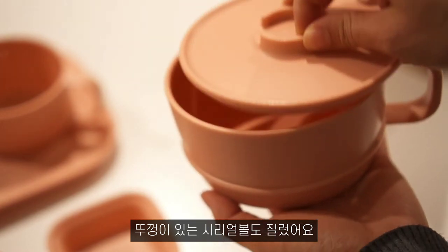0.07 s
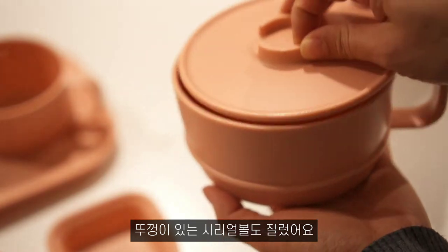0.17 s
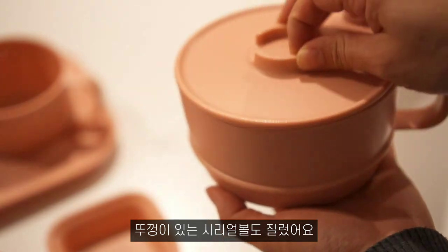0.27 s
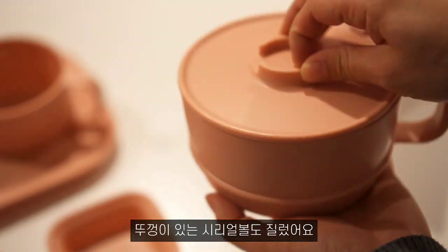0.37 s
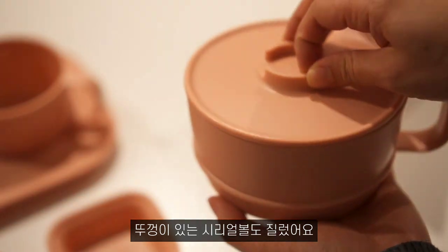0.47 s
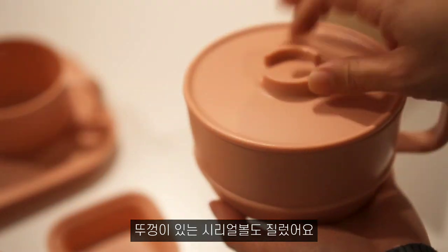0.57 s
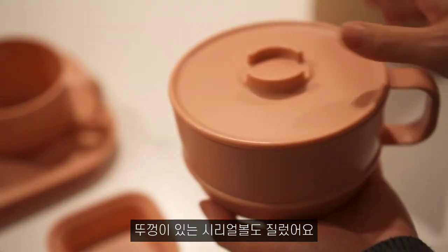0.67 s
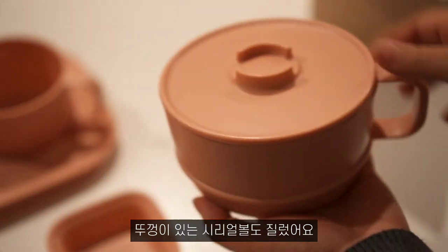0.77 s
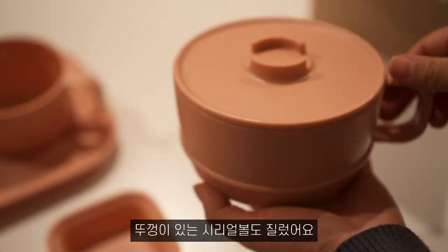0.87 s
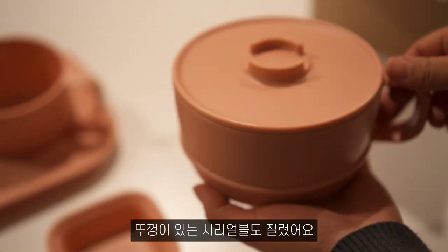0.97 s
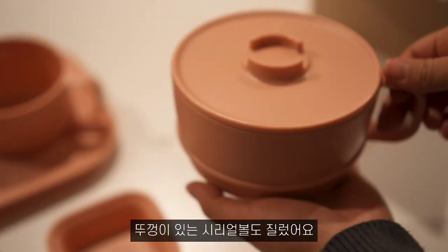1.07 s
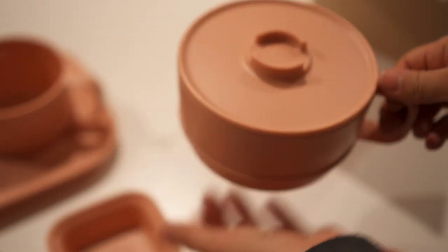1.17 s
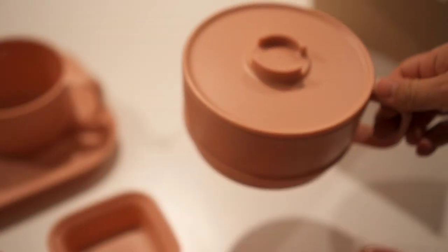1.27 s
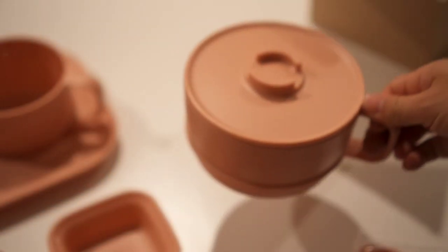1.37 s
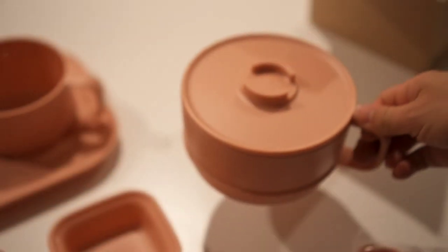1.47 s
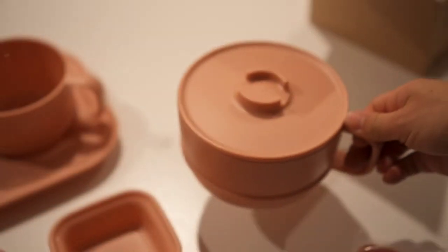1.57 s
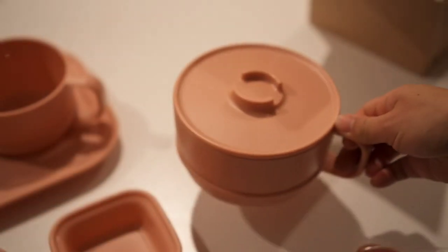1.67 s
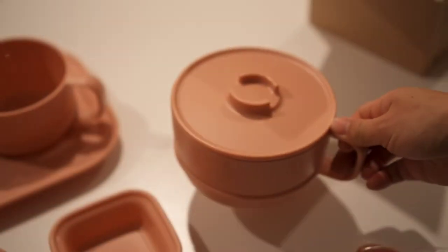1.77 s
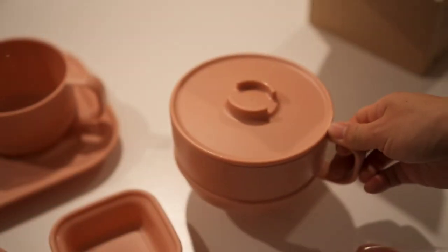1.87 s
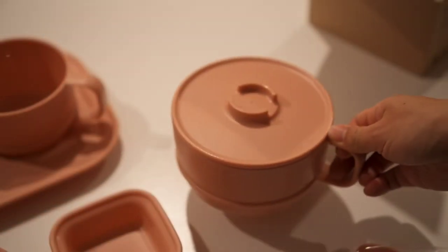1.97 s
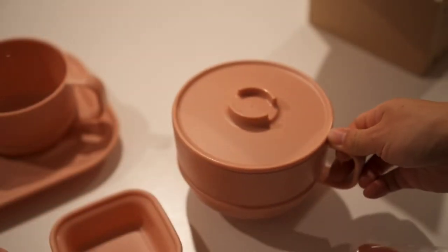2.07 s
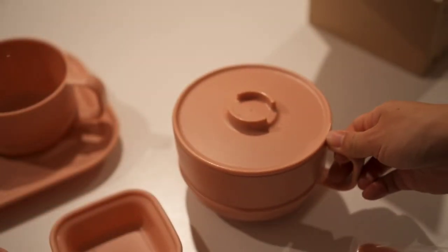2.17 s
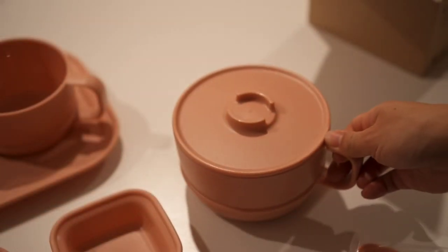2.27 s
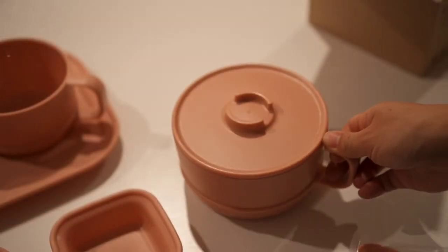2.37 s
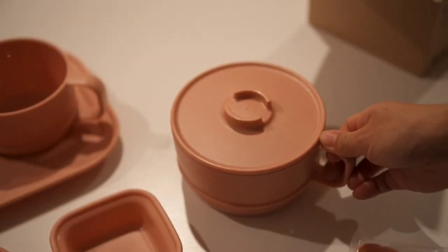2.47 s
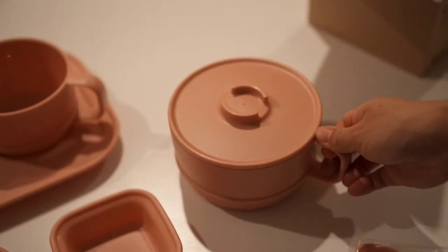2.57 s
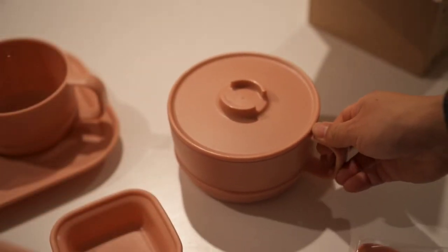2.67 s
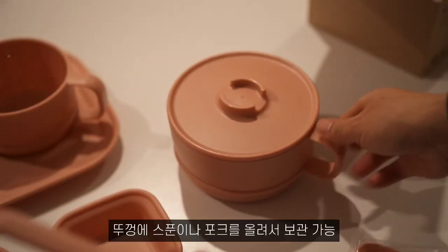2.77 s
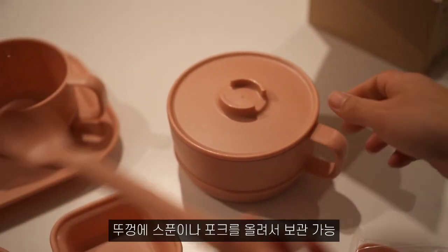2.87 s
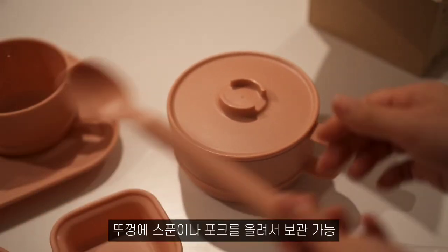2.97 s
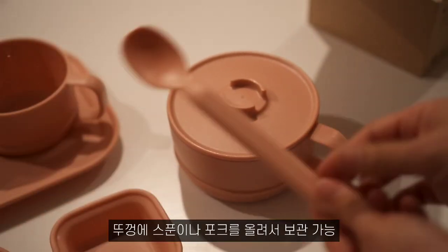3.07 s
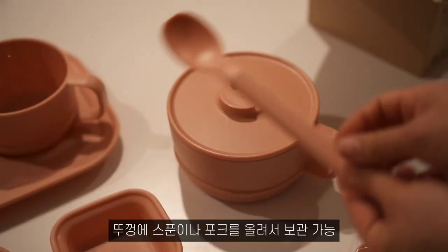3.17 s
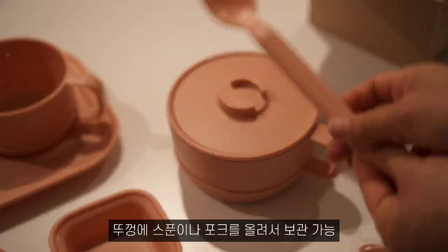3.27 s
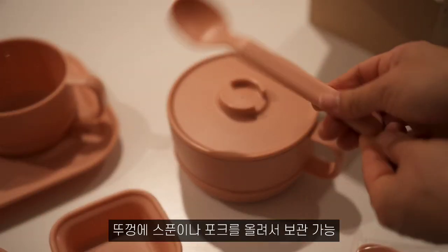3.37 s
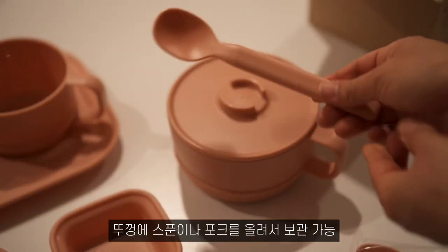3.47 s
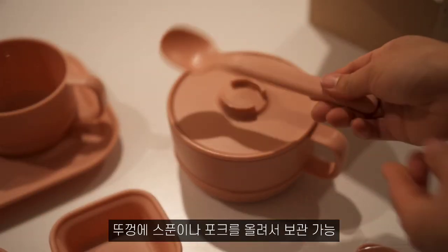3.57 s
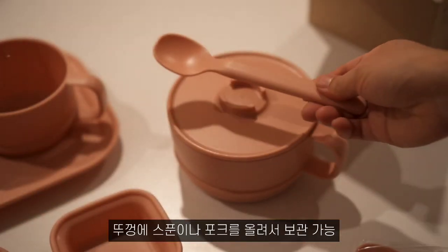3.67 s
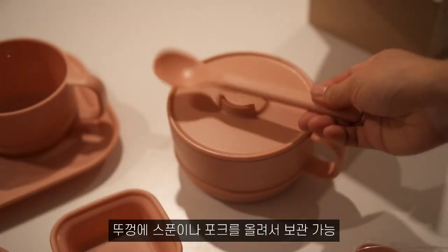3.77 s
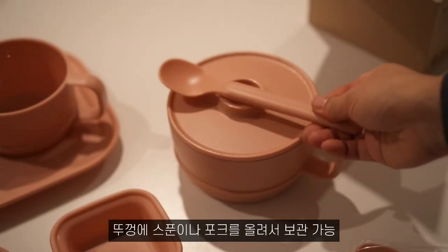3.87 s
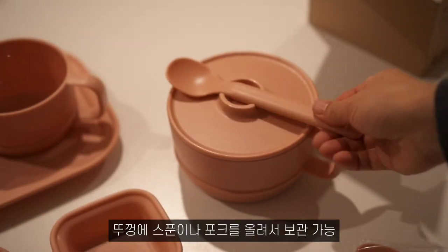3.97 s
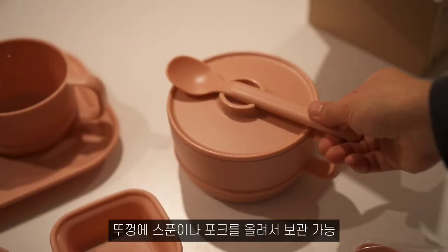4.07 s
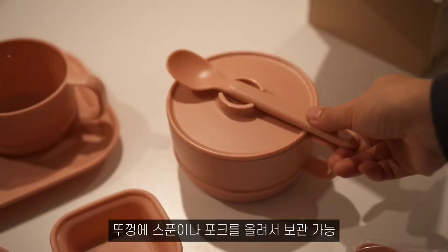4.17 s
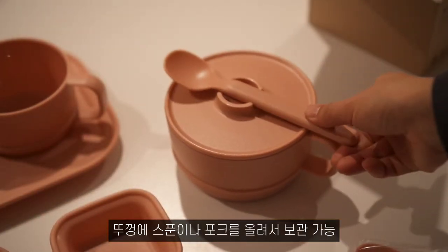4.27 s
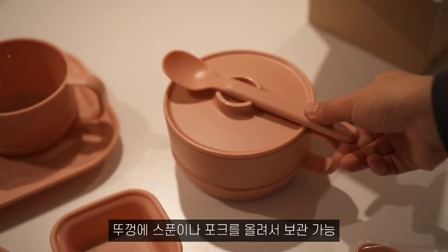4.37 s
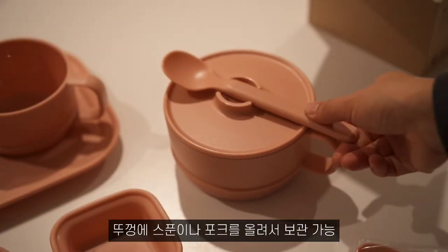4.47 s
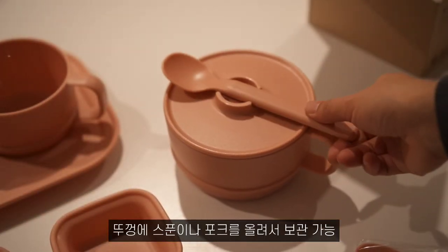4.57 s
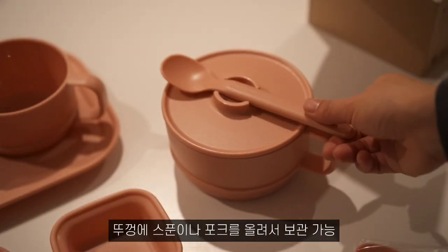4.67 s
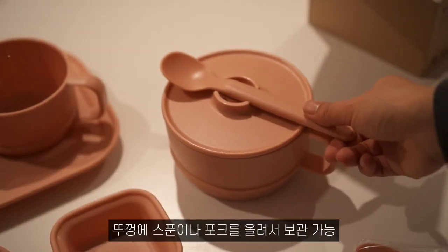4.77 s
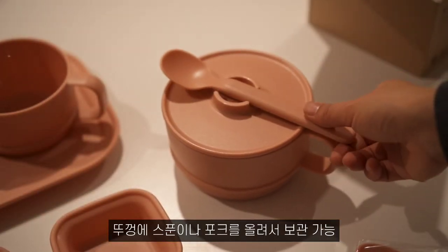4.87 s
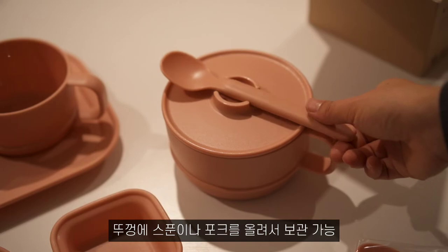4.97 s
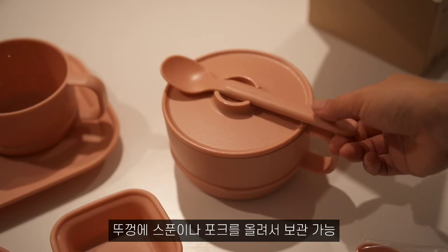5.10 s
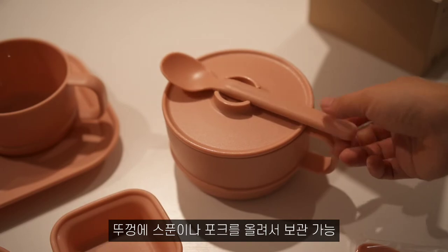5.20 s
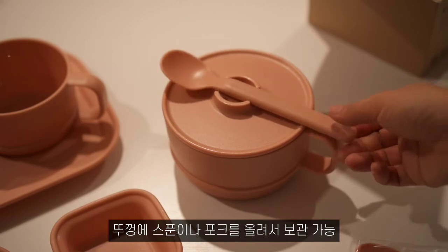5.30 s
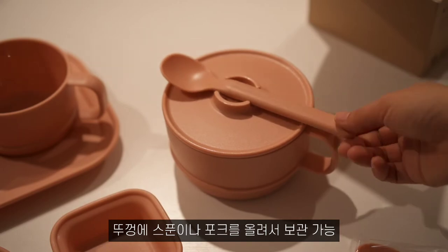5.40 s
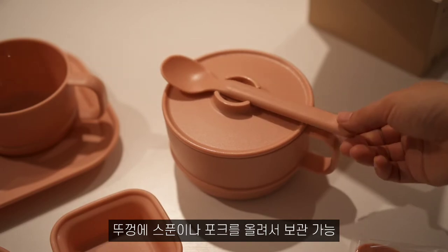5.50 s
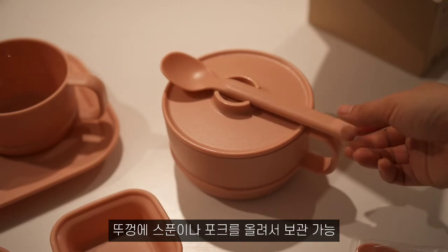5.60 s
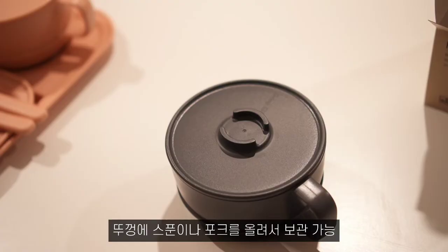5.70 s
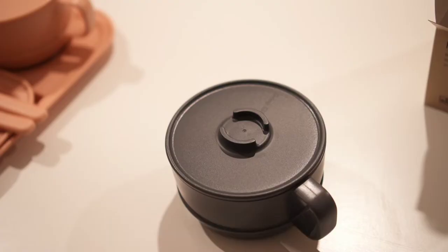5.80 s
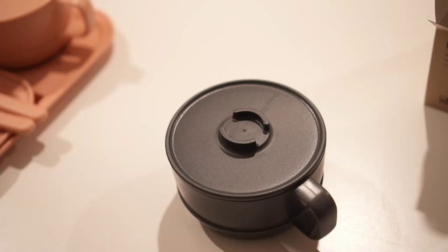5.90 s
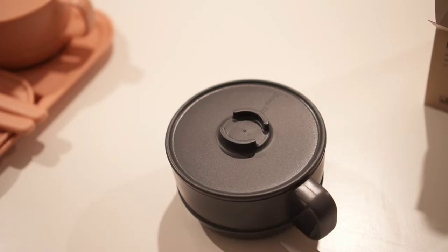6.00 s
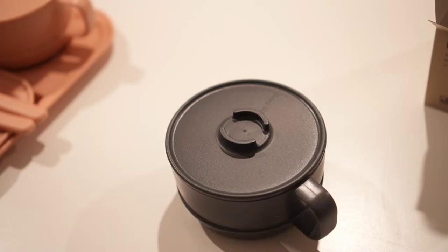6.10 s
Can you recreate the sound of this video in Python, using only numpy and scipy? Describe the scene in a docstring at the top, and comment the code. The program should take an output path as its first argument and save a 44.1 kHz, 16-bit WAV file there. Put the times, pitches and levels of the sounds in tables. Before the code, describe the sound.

Close stereo pickup in a small, quiet room with faint ventilation. A lid clacks twice onto a bowl, with a brief hollow hoot sinking in pitch. Light fingernail ticks and soft shuffles follow as the bowl is carried, then it lands with a knock, low thump and quick chatter. A spoon clatters onto the lid in two groups of hard clacks, then is nudged with smaller clicks. A sleeve rustles at the end.

```python
"""Lidded bowl and spoon

A lid is dropped onto a ceramic cereal bowl, the bowl is set on a table, and a spoon is laid on the lid and nudged.
Every contact is a click, a short dense ring of noise and a few decaying modes.
The air under the closing lid hoots in sinking tones, and the closed bowl thumps in low, slowly rising ones.
A small room answers each knock over a faint ventilation hiss and rumble; skids, shuffles and cloth are shaped noise.
"""
import sys
import numpy as np
from scipy import signal
from scipy.fft import rfft, irfft, next_fast_len
from scipy.io import wavfile
from scipy.ndimage import map_coordinates

SR = 44100
rng = np.random.default_rng(int(sys.argv[2]) if len(sys.argv) > 2 else 0)


def dump(signal):
    """Clip the signal to [-1, 1] and save it as 16-bit WAV at the path in sys.argv[1]."""
    limited = np.clip(np.atleast_2d(signal).T, -1, 1)
    pcm = np.round(limited * 32767).astype(np.int16)
    wavfile.write(sys.argv[1], SR, pcm)


N = 270774  # length in samples


def amp(db):
    """Decibels to gain."""
    return 10 ** (np.asarray(db) / 20)


def unit(x):
    """Scale to rms 1."""
    return x / np.sqrt(np.mean(x ** 2))


def unit_energy(x):
    """Scale to a mean energy of 1 per channel."""
    return unit(x) / np.sqrt(x.shape[-1])


def along(points, hz):
    """Read (Hz, value) points on a log frequency axis."""
    point_hz, value = np.transpose(points)
    return np.interp(np.log(hz + 1), np.log(point_hz + 1), value)


def fade(t, t60):
    """Exponential decay, 60 dB down at t60 seconds."""
    return np.exp(-np.log(1000) * t / t60)


def swell(strokes):
    """Gain of a set of strokes: each gathers smoothly to its peak, then dies away; their powers add."""
    power = np.zeros(N)
    for peak_s, peak_db, rise_s, t60_s in strokes:
        t = np.arange(N) / SR - peak_s
        gather = np.exp(-2 * (np.minimum(t, 0) / rise_s) ** 2)
        power += amp(peak_db) ** 2 * gather * fade(np.maximum(t, 0), t60_s) ** 2
    return np.sqrt(power)


def grain(depth_db, rate):
    """A gain of rms 1 that wanders smoothly between random values, rate of them a second."""
    knots = rng.standard_normal(int(N * rate / SR) + 4)
    return unit(amp(depth_db * map_coordinates(knots, [np.arange(N) * rate / SR])))


def filtered(x, response):
    """Zero-phase filter with a gain given as a function of frequency."""
    n = x.shape[-1]
    padded = next_fast_len(n + SR // 10)
    spectrum = rfft(x, padded) * response(np.fft.rfftfreq(padded, 1 / SR))
    return irfft(spectrum, padded)[..., :n]


def coloured(x, level_db, size=32768):
    """Minimum-phase filter: causal, so that nothing sounds before a blow."""
    cepstrum = irfft(np.log(amp(level_db(np.fft.rfftfreq(size, 1 / SR)))))
    # fold the cepstrum onto positive time
    cepstrum[1:size // 2] *= 2
    cepstrum[size // 2 + 1:] = 0
    return irfft(rfft(x, size) * np.exp(rfft(cepstrum)), size)[..., :x.shape[-1]]


def noise_pair(n, alike):
    """White stereo noise with a given left-right likeness: more alike means more mid and less side."""
    turn = lambda hz: np.arccos(np.clip(along(alike, hz), -1, 1)) / 2
    balance = lambda hz: np.array([np.cos(turn(hz)), np.sin(turn(hz))])
    mid, side = filtered(rng.standard_normal((2, n)), balance)
    return np.array([mid + side, mid - side])


def rush(colour, alike):
    """Steady coloured stereo noise of rms 1."""
    return unit(filtered(noise_pair(N, alike), lambda hz: amp(along(colour, hz))))


def add(track, start_s, sound):
    """Mix a sound into the track, cut off at the track's end."""
    part = track[:, round(start_s * SR):][:, :sound.shape[-1]]
    part += sound[..., :part.shape[-1]]


# How long the room rings: pitch_hz, t60_s
ROOM_DECAY = [(100, 0.44), (300, 0.36), (1000, 0.39), (2000, 0.34), (5000, 0.32), (12000, 0.27)]
# How similar the room's tail is left and right: pitch_hz, likeness (1 = same)
ROOM_LIKENESS = [(200, 1), (900, 0.84), (2500, 0.56), (7000, 0.19), (15000, .15)]
# Relative strength of the walls' answer: pitch_hz, level_db
WALL_COLOUR = [(120, 3.5), (300, -1), (600, 3.5), (1200, -2.5), (3000, 0), (12000, -0.5)]


def in_room(sound, wet_db, build=0.0047):
    """The sound and a fresh diffuse tail, which builds up as the walls answer and dies at its own pace per band."""
    t = np.arange(SR // 2) / SR
    hz, frames, bands = signal.stft(noise_pair(len(t), ROOM_LIKENESS), SR, nperseg=256)
    bands = bands * fade(frames, along(ROOM_DECAY, hz)[:, None])
    bands = bands * amp(along(WALL_COLOUR, hz))[:, None]
    tail = signal.istft(bands, SR, nperseg=256)[1][:, :len(t)]
    tail = unit_energy(tail * (1 - np.exp(-(t / build) ** 2)))
    answer = signal.fftconvolve(sound.mean(0)[None], tail, axes=1)[:, :sound.shape[-1]]
    return sound + amp(wet_db) * answer


# Modes of the crockery and the table under it, before each blow's colour and scatter: pitch_hz, level_db, t60_s
CROCKERY_MODES = [(140.4, -14.5, 0.42), (231, -23, 0.2), (320.2, -14.5, 0.24), (396.5, -14.5, 0.11),
                  (763, -11.5, 0.4), (870, -12, 0.069), (1188, -9, 0.13), (1268, -6, 0.11),
                  (1508, -12, 0.34), (1593, -11.5, 0.25), (1850, -11, 0.28), (2003, -7, 0.077),
                  (2217, -13.5, 0.12), (2920, -8.5, .12), (3810, -11, 0.16), (4060, -13, 0.15),
                  (5300, -19, 0.092)]
# How similar the direct sound is left and right: pitch_hz, likeness (1 = same)
DIRECT_LIKENESS = [(400, 1), (1500, 0.69), (6000, 0.71), (15000, 0.34)]


def knocks(rows, colour, ring_t60, ring_db, modes_db, wet_db, contact=0.000065,
           dense_hz=650, bass_hz=450, clack_octaves=0.44, treble_hz=3200):
    """Each contact: a click, a dense short ring and the modes, coloured by where and how hard the touch is."""
    track, t = np.zeros((2, N)), np.arange(SR // 2) / SR
    mode_hz, mode_db, mode_t60 = np.transpose(CROCKERY_MODES)[:, :, None]
    modes = np.sin(2 * np.pi * mode_hz * t) * fade(t, mode_t60)
    modes = modes / np.linalg.norm(modes, axis=1, keepdims=True)
    click = fade(t, contact) / fade(t, contact).sum()
    for start_s, level_db, bass_db, clack_hz, clack_db, treble_db in rows:
        # the quickly damped modes crowd together only above the bass
        crowd = filtered(noise_pair(len(t), DIRECT_LIKENESS), lambda hz: hz ** 2 / (hz ** 2 + dense_hz ** 2))
        ring = unit_energy(crowd * fade(t, ring_t60))
        # every point of contact favours other modes
        tones = (amp(mode_db + rng.normal(0, 1.4, mode_db.shape)) * modes).sum(0)
        blow = click + amp(ring_db) * ring + amp(modes_db) * tones
        touch = lambda hz: (along(colour, hz)
                            + bass_db / (1 + (hz / bass_hz) ** 4)
                            + clack_db * np.exp(-(np.log2((hz + 1) / clack_hz) / clack_octaves) ** 2)
                            + treble_db * hz ** 2 / (hz ** 2 + treble_hz ** 2))
        # levels count the dry blow's energy as if spread over 10 ms
        blow = unit_energy(coloured(blow, touch)) * np.sqrt(SR / 100)
        add(track, start_s, amp(level_db) * in_room(blow, wet_db))
    return track


def chatter(runs, gap_s=.013, slop_s=.002, scatter_db=-1, centre_hz=1820, octaves=0.59, clack_db=2):
    """Runs of quick, uneven contacts that weaken overall; the clack wanders as the point of contact travels."""
    contacts = []
    for start_s, length_s, first_db, dying_db_per_s, bass_db, treble_db in runs:
        for k, (slop, force, spot) in enumerate(rng.standard_normal(size=(40, 3))):
            t = k * gap_s
            if t < length_s:
                contact_s = start_s + t + slop_s * slop
                level_db = first_db - dying_db_per_s * t + scatter_db * force
                clack_hz = centre_hz * 2 ** (octaves * spot)
                contacts.append((contact_s, level_db, bass_db, clack_hz, clack_db, treble_db))
    return contacts


# Colour of the room air, relative: pitch_hz, level_db
AIR_COLOUR = [(12, -60), (20, -46), (74, -1.5), (150, -1), (542, -5.5), (738, -6), (825, -5.5), (949, 0),
              (1330, -8.5), (1530, -4), (2460, -11.5), (2750, -6), (3070, -13), (13500, -19.5),
              (16000, -22.5)]
# How similar the air is left and right: pitch_hz, likeness (1 = same)
AIR_LIKENESS = [(60, 1), (300, 0.12), (1000, 0.23), (4000, 0.11)]


def ventilation(air_db=-59, whistle_hz=1020, width_hz=110, whistle_db=-68):
    """Steady room air with one faint duct resonance."""
    resonance = lambda hz: 1 / (1 + (2 * (hz - whistle_hz) / width_hz) ** 2)
    duct = filtered(noise_pair(N, AIR_LIKENESS), resonance)
    return amp(air_db) * rush(AIR_COLOUR, AIR_LIKENESS) + amp(whistle_db) * unit(duct)


# The slow rumble of moving arms: peak_s, peak_db, rise_s, t60_s
ARM_STROKES = [(1.75, -72.5, .4, 9.9), (2.4, -72, 0.6, 2.6), (5.7, -73.5, .45, 5)]
# Colour of the rumble, relative: pitch_hz, level_db
LOW_COLOUR = [(20, -24), (48, -12), (80, -14), (160, -21), (500, -82)]


def rumble(blows, rest_db=-83, shake_db=-28, shake_s=0.072, on_table_s=2.4):
    """The table shakes with the bass of every blow on it; moving arms add a slow rumble to a steady floor."""
    bass = filtered(blows.mean(0), lambda hz: 1 / (1 + (hz / 450) ** 4))
    # the bowl is held in the air until on_table_s
    bass = bass * (np.arange(N) / SR > on_table_s)
    memory = np.exp(-np.arange(SR // 2) / SR / shake_s)
    shake = np.sqrt(np.abs(signal.fftconvolve(bass ** 2, memory / memory.sum())[:N]))
    gain = amp(rest_db) + np.hypot(swell(ARM_STROKES), amp(shake_db) * shake)
    return gain * rush(LOW_COLOUR, [(50, 0.98)])


# The lid lands on one edge, then drops shut; clack is the tone of the struck spot:
# start_s, level_db, extra_bass_db, clack_hz, clack_db, extra_treble_db
LID_KNOCKS = [(.2019, -27, -27, 1530, 2, -16), (.2098, -23, -14, 2530, 7, -7),
              (.2128, -24, -20, 2510, 9, 1.5), (.3282, -21.5, 3.5, 5600, 5.5, 3),
              (.3372, -18, 10.5, 1950, 8.5, 3.5), (.3638, -33, -29, 7700, 5, 10),
              (.372, -26, 5.5, 2490, 6, -19)]
# Colour of the lid's blows, relative: pitch_hz, level_db
LID_TONE = [(40, -87), (100, -30.5), (200, -15.5), (300, -5.5), (480, -3), (850, -4), (1150, -7.5),
            (1900, -7), (3200, -17), (5000, -16.5), (6500, -26.5), (10000, -34), (16000, -38)]


def lid_on_bowl():
    """Glazed edge meets rim: bright clacks over a short ring."""
    return knocks(LID_KNOCKS, LID_TONE, ring_t60=0.027, ring_db=6, modes_db=-14, wet_db=-7)


# Air ringing under the lid, lower as the gap closes; level is before rise and decay:
# start_s, start_hz, end_hz, level_db, t60_s
LID_HOOTS = [(0.2024, 735, 680, -18, 0.085), (0.2133, 658, 605, -14, 0.16),
             (0.3281, 469, 441, -14.5, 0.125)]


def hoots(settle=0.084, rise=.001, wet_db=-8):
    """The bowl's air rings through the gap under the lid and sinks in pitch as the lid settles."""
    track, t = np.zeros((2, N)), np.arange(SR // 2) / SR
    for start_s, start_hz, end_hz, level_db, t60_s in LID_HOOTS:
        hz = end_hz + (start_hz - end_hz) * np.exp(-t / settle)
        envelope = (1 - np.exp(-(t / rise) ** 2)) * fade(t, t60_s)
        tone = amp(level_db) * np.sin(2 * np.pi * np.cumsum(hz) / SR) * envelope
        add(track, start_s, in_room(np.array([tone, tone]), wet_db))
    return track


# Blows that set the whole closed bowl thumping; level is before rise and decay:
# start_s, level_db, pitch_hz, rise_s, t60_s
BOWL_THUMPS = [(.369, -20.5, 289, 0.0011, 0.041), (.98, -32, 283.5, 0.0028, 0.11),
               (1.108, -44, 294, 0.0095, 0.092), (2.417, -46.5, 307, .01, 0.17),
               (2.574, -9, 315, 0.0036, 0.026), (2.855, -35.5, 294, 0.013, 0.038),
               (4.075, -24, 305, .0017, 0.1), (5.405, -31, 308, 0.0045, .12)]


def thumps(wet_db=-10):
    """A soft contact rises slowly and wakes only the bowl's lowest resonance."""
    track, t = np.zeros((2, N)), np.arange(SR // 2) / SR
    for start_s, level_db, pitch_hz, rise_s, t60_s in BOWL_THUMPS:
        envelope = (1 - np.exp(-(t / rise_s) ** 2)) * fade(np.maximum(t - rise_s, 0), t60_s)
        tone = amp(level_db) * np.sin(2 * np.pi * pitch_hz * t) * envelope
        add(track, start_s, in_room(np.array([tone, tone]), wet_db))
    return track


# Fingernails tick on the crockery: start_s, level_db, clack_hz, extra_treble_db
NAIL_TICKS = [(.979, -48.5, 3700, -8), (1.01, -49.5, 890, -17), (1.114, -55, 4200, -1),
              (1.638, -62, 1500, -6), (1.965, -51.5, 1700, -19), (3.194, -50, 6560, 32),
              (3.327, -53, 7500, 2)]
# Colour of small sharp touches, relative; the cloth snaps share it: pitch_hz, level_db
SHARP_COLOUR = [(100, -12), (700, -0.5), (1500, -3), (3500, -1.5), (7000, -7), (15000, -11)]


def fingernail_ticks(clack_db=6):
    """Light, hard touches that barely wake the modes."""
    rows = [(start_s, level_db, 0, clack_hz, clack_db, treble_db)
            for start_s, level_db, clack_hz, treble_db in NAIL_TICKS]
    return knocks(rows, SHARP_COLOUR, ring_t60=0.022, ring_db=1, modes_db=-21, wet_db=-1.5)


# Fingertips skid on the glaze as they take and leave the handle: peak_s, peak_db, rise_s, t60_s
SKID_STROKES = [(1.119, -47.5, .01, 0.069), (2.847, -55, 0.013, 0.084)]
# Colour of the skids, relative: pitch_hz, level_db
SKID_TONE = [(500, -27), (2500, -8), (3200, 1), (4500, -8), (6500, -14), (15000, -26)]


def finger_skid():
    """Short bright rubs of the fingers on the handle."""
    return in_room(swell(SKID_STROKES) * rush(SKID_TONE, DIRECT_LIKENESS), wet_db=-5.5)


# Soft shuffles while the bowl is carried and let go: peak_s, peak_db, rise_s, t60_s
SHUFFLE_STROKES = [(1.475, -50.5, 0.055, 0.29), (1.595, -51.5, 0.014, .4), (1.99, -59.5, 0.032, 0.86),
                   (2.11, -58.5, 0.071, 0.38), (2.86, -55, 0.069, .3)]
# Colour of the shuffles, relative: pitch_hz, level_db
SHUFFLE_TONE = [(100, -24), (300, 16), (600, 9.5), (1200, 8.5), (2000, 2), (4000, -14), (12000, -23)]


def carrying_shuffle():
    """Handling the bowl makes dull, slightly grainy noise."""
    return swell(SHUFFLE_STROKES) * grain(depth_db=1, rate=180) * rush(SHUFFLE_TONE, ROOM_LIKENESS)


# The bowl lands on the edge of its foot, then comes down flat:
# start_s, level_db, extra_bass_db, clack_hz, clack_db, extra_treble_db
BOWL_KNOCKS = [(2.441, -19.5, 1.4, 1980, 3.7, -0.5), (2.5715, -32, 13.5, 600, 2.3, -20),
               (2.5765, -25, 10.7, 1080, 3, 1)]
# The landed bowl chatters on the table: start_s, length_s, first_db, dying_db_per_s, extra_bass_db, extra_treble_db
BOWL_RUNS = [(2.448, .11, -29, 77, -5, -3.5), (2.6, 0.3, -45, 52, 9, 4)]
# Colour of the bowl's blows, relative: pitch_hz, level_db
BOWL_TONE = [(40, -34), (120, -24), (240, 1), (450, 5.5), (750, 4), (1200, 1), (2100, -7.5), (2900, -17),
             (5000, -25.5), (9000, -39), (16000, -51)]


def bowl_on_table():
    """The foot knocks on the table and chatters."""
    rows = list(BOWL_KNOCKS) + chatter(BOWL_RUNS)
    return knocks(rows, BOWL_TONE, ring_t60=0.029, ring_db=6, modes_db=-11.5, wet_db=-2)


# Strokes of the sleeve: peak_s, peak_db, rise_s, t60_s
SLEEVE_STROKES = [(3.47, -61.5, 0.072, 1), (5.742, -50.5, .004, 0.53), (5.862, -48.5, .012, 0.28),
                  (5.905, -45, 0.016, 0.45), (5.975, -50, 0.022, 0.2)]
# Colour of the cloth, relative: pitch_hz, level_db
SLEEVE_TONE = [(120, -38), (200, -13), (263, -12), (353, -8), (763, -14), (899, -15), (1840, -3),
               (15100, -6.5), (16000, -39)]


def sleeve_rustle():
    """Cloth catches and slips in tiny grains, louder on the right."""
    cloth = rush(SLEEVE_TONE, [(300, 0.42), (3000, 0.06)])
    return swell(SLEEVE_STROKES) * grain(depth_db=2.0, rate=760) * cloth * amp([[-1], [3.4]])


# The spoon meets the lid, drops into the notch of the knob and settles:
# start_s, level_db, extra_bass_db, clack_hz, clack_db, extra_treble_db
SPOON_KNOCKS = [(3.937, -21, 3.5, 2000, 8.3, 2), (3.9437, -32, 16.5, 700, 2.5, 5),
                (3.961, -24, -10, 2090, 5.5, -10), (3.971, -28.5, 13, 1700, 2.8, -22),
                (4.0657, -22.5, 1, 2680, 6.1, -15.5), (4.0725, -19.5, 3, 1260, 3.1, -9),
                (4.0762, -21.5, -9, 13100, 4.1, 19), (4.224, -37, 6.5, 1300, 2.7, -23)]
# The landed spoon chatters: start_s, length_s, first_db, dying_db_per_s, extra_bass_db, extra_treble_db
SPOON_RUNS = [(4.083, .12, -36, 80, 2.2, -7)]
# Colour of the spoon's blows, relative: pitch_hz, level_db
SPOON_TONE = [(40, -57), (120, -22), (220, -3.5), (310, 0), (520, -1.5), (780, -4), (1300, -7.5),
              (2100, -7), (3100, -13.5), (5000, -14.5), (9000, -23.5), (16000, -36)]


def spoon_on_lid():
    """The spoon knocks on the lid with a very short ring, then chatters."""
    rows = list(SPOON_KNOCKS) + chatter(SPOON_RUNS)
    return knocks(rows, SPOON_TONE, ring_t60=0.015, ring_db=10.0, modes_db=-10.5, wet_db=-2)


# The spoon is nudged in its notch: start_s, level_db, extra_bass_db, clack_db, extra_treble_db
SPOON_NUDGES = [(4.312, -26.5, -4, 6, -7.5), (4.32, -33.5, -1.5, 6.5, -4), (4.742, -49, 4.5, 1, -5),
                (4.768, -51.5, 5, -8, -2), (4.977, -42.5, -8, 3.5, -18), (5.029, -51.5, -2, -15, -5),
                (5.164, -33, 5.5, 5, 2), (5.316, -55, -12, 3, -2), (5.3507, -30, 4.5, 7, 0),
                (5.364, -31, 4, -18, -22), (5.396, -43.5, 2, 8, -4), (5.566, -39.5, 9, 4, -15)]
# Colour of the nudges, relative: pitch_hz, level_db
NUDGE_TONE = [(40, -50), (90, -22), (140, -4.5), (280, 5.5), (380, 5.5), (480, -6.5), (750, -12),
              (1200, -4), (1700, -15), (2400, -13), (3100, -25), (7000, -30.5), (16000, -58)]


def spoon_nudges(clack_hz=2060):
    """The spoon always strikes the same spot, so the clack keeps its pitch."""
    rows = [(start_s, level_db, bass_db, clack_hz, clack_db, treble_db)
            for start_s, level_db, bass_db, clack_db, treble_db in SPOON_NUDGES]
    return knocks(rows, NUDGE_TONE, ring_t60=0.031, ring_db=7, modes_db=-14.5, wet_db=-6)


# Folds of the sleeve snap; level is before the left-right balance: start_s, level_db, extra_treble_db
FOLD_SNAPS = [(5.76, -50, 5), (5.846, -52.5, 13), (5.858, -48.5, -5), (5.925, -48.5, -11),
              (5.956, -50.5, -15), (5.972, -45.5, -1), (5.9901, -43.5, 4)]


def sleeve_snaps(clack_hz=3800, clack_db=2.5):
    """Folds of cloth snap: short noisy knocks with next to no modes, louder on the right."""
    rows = [(start_s, level_db, 0, clack_hz, clack_db, treble_db)
            for start_s, level_db, treble_db in FOLD_SNAPS]
    snaps = knocks(rows, SHARP_COLOUR, ring_t60=0.015, ring_db=11, modes_db=-38, wet_db=-5)
    return snaps * amp([[-1], [1]])


# Stereo lean of the crockery: pitch_hz, left_minus_right_db
STEREO_LEAN = [(300, 0), (800, 1.6), (2000, -1.5), (4000, -0.2), (12000, -0.7)]


def crockery():
    """Lid on bowl, bowl on table, spoon on lid and the small touches, leaning left or right by frequency."""
    blows = lid_on_bowl() + fingernail_ticks() + bowl_on_table() + spoon_on_lid() + spoon_nudges()
    return filtered(blows, lambda hz: amp(np.outer([.5, -.5], along(STEREO_LEAN, hz))))


def scene():
    """Everything at the table."""
    handling = finger_skid() + carrying_shuffle() + sleeve_rustle() + sleeve_snaps()
    bowl_air = hoots() + thumps()
    blows = crockery()
    return ventilation() + handling + bowl_air + blows + rumble(blows)


def record(dry, top_hz=16100):
    """Keep nothing above the band limit."""
    return filtered(dry, lambda hz: hz < top_hz)


dry = scene()
out = record(dry)
dump(out)
```